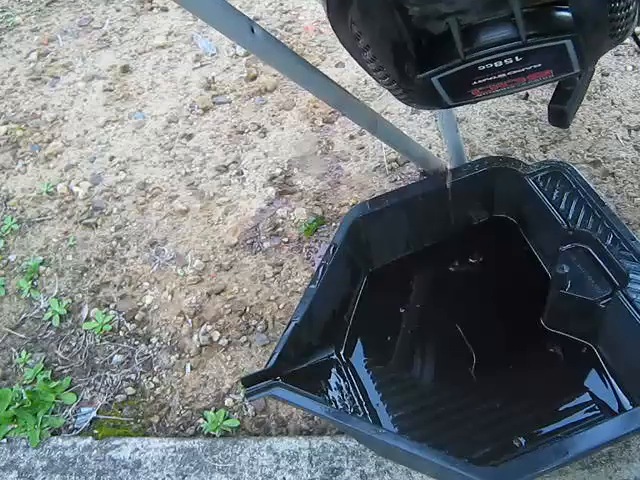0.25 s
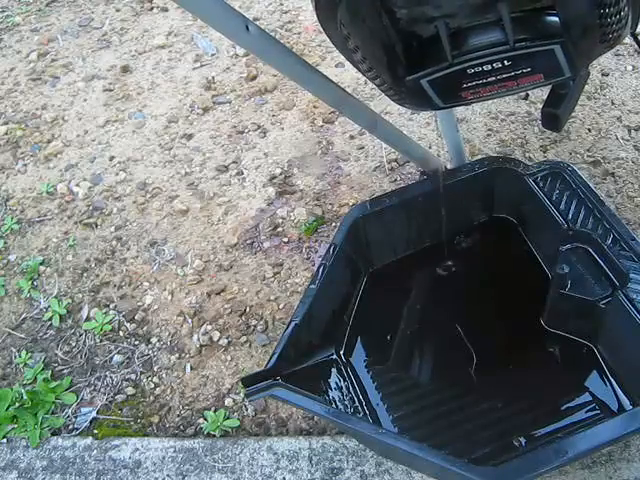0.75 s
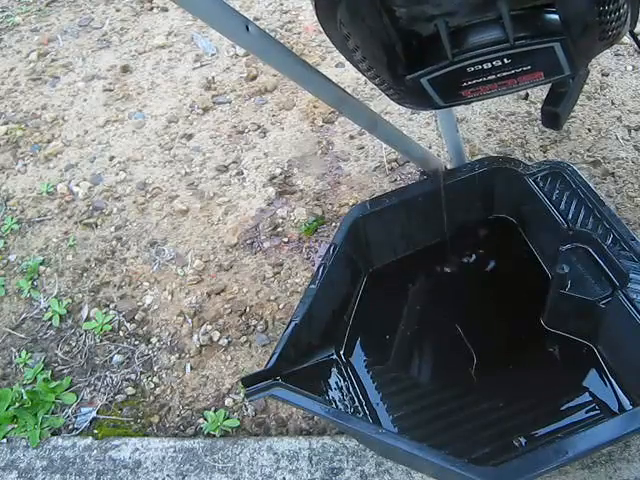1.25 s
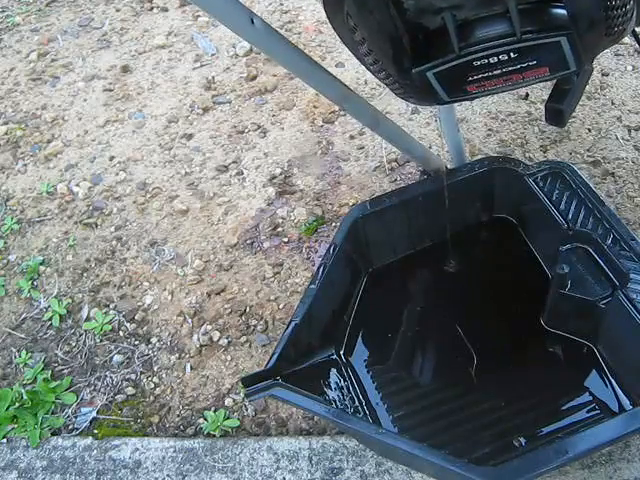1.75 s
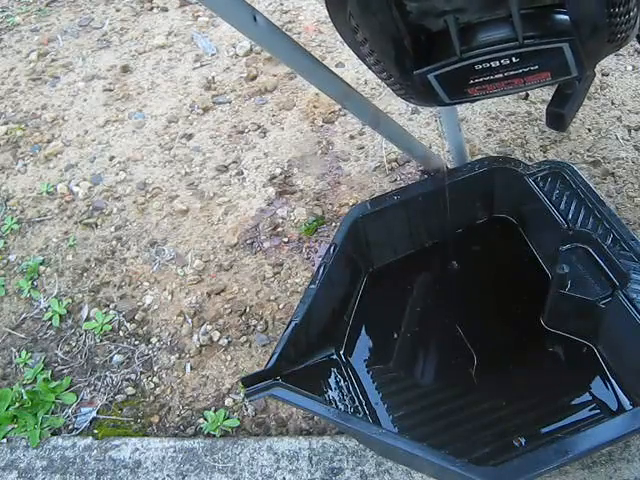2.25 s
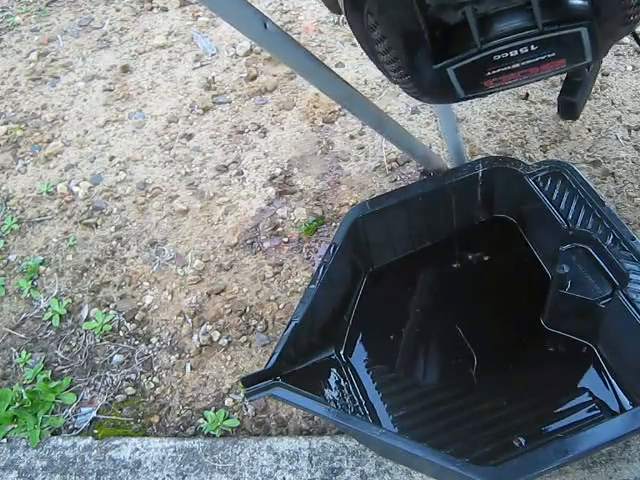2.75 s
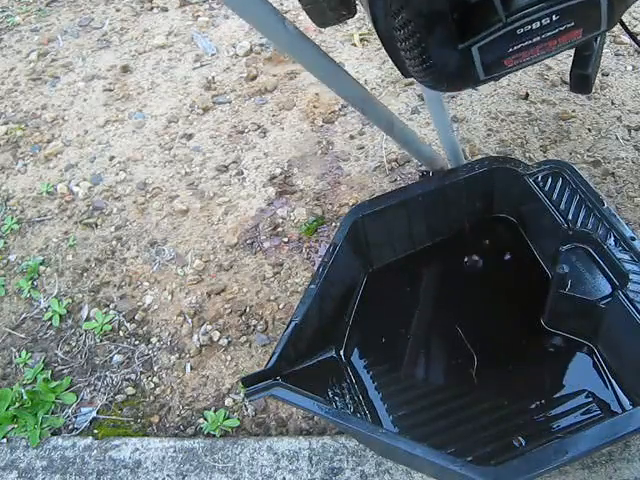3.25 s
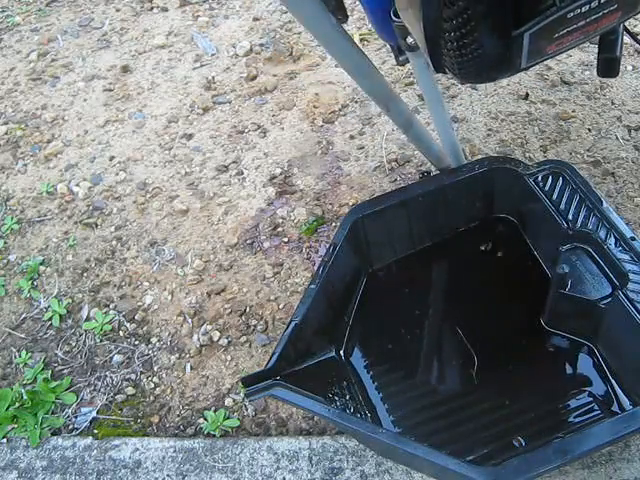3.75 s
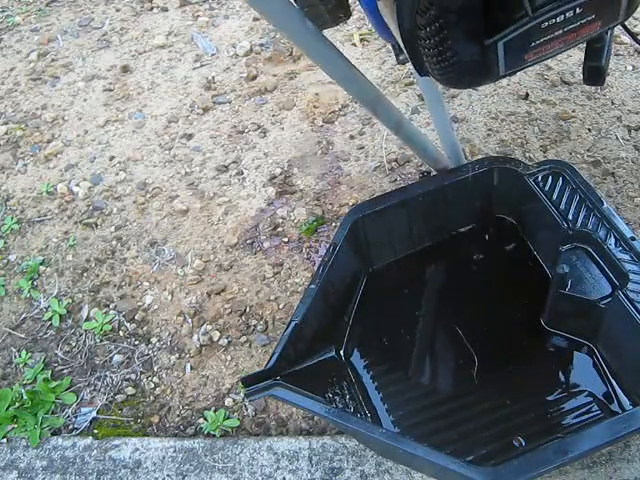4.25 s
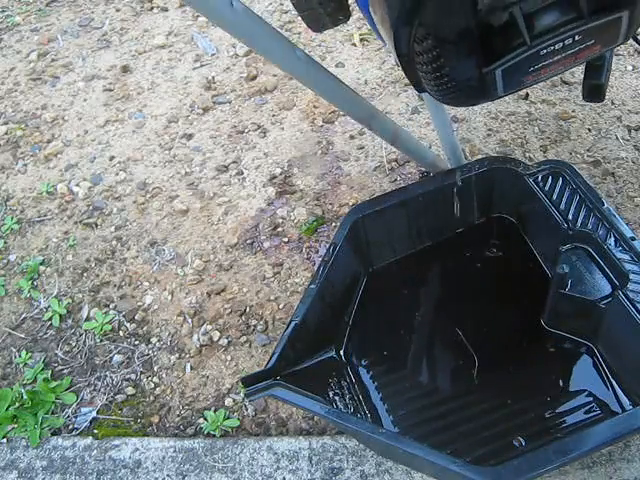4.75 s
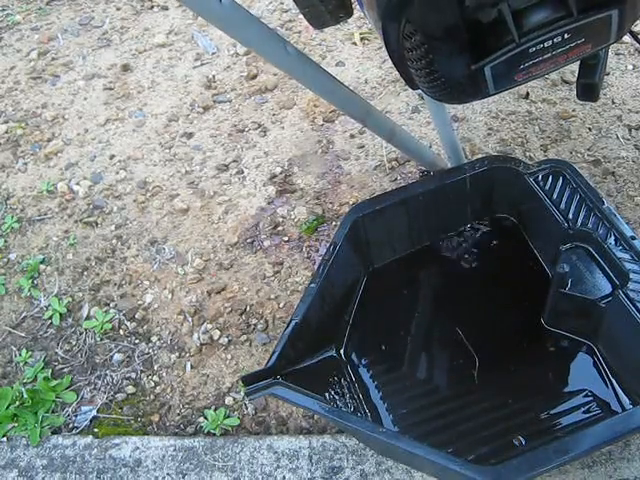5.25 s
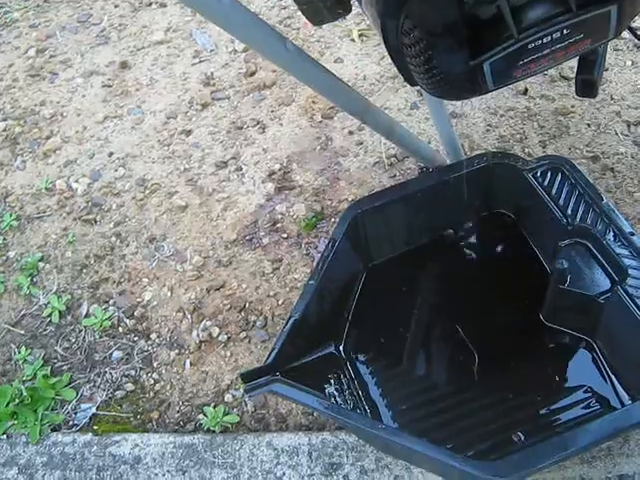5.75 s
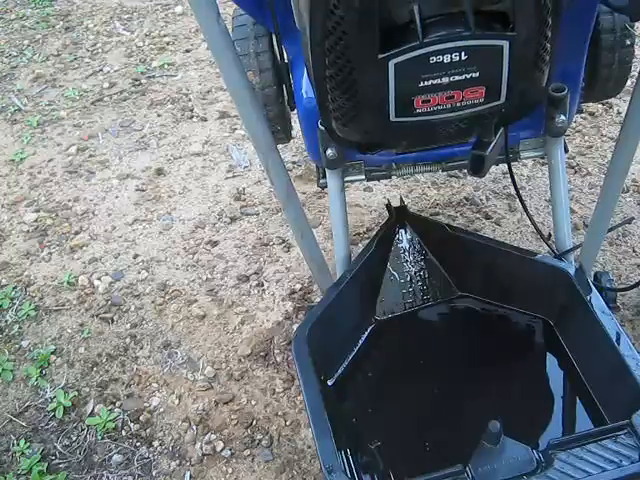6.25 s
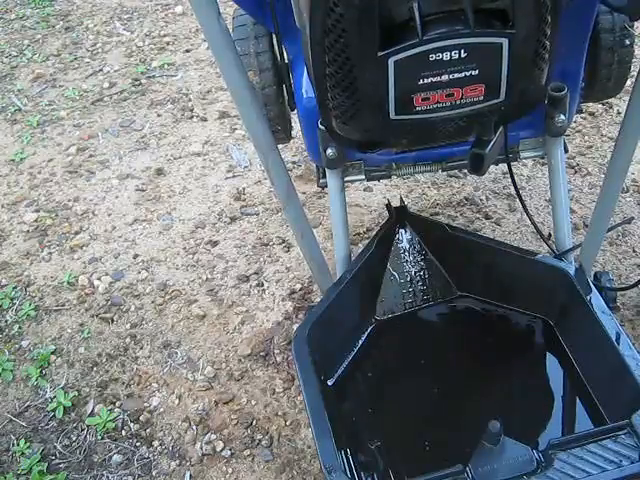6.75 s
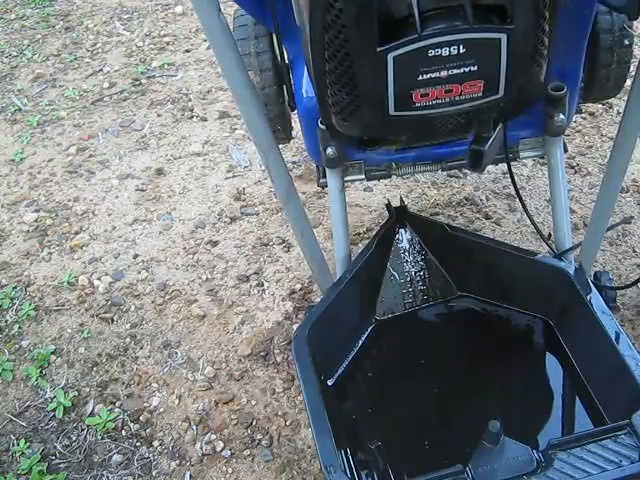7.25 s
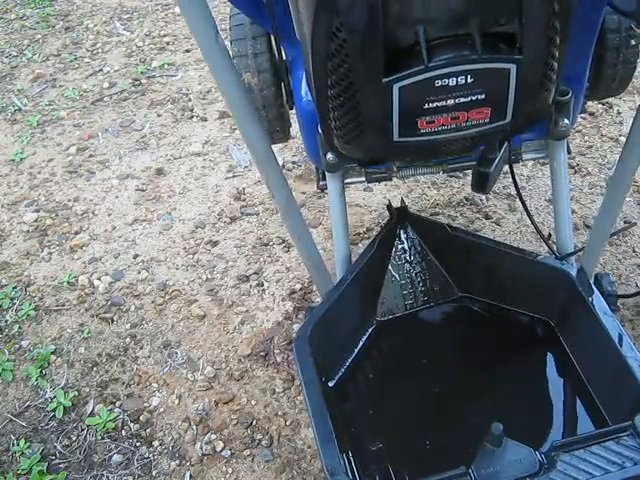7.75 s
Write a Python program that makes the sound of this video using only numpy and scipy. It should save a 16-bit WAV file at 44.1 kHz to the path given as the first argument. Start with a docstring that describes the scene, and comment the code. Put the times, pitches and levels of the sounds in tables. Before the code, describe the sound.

Thin oil drips patter into a plastic pan outdoors, interrupted by a mower shifting on gravel with crunches and metallic knocks.

```python
"""Outdoors in a gravel yard, used oil dribbles from a tipped mower into a plastic pan.
Each drop ticks and traps a small air bubble, which resonates in a brief chirp. The mower shifts:
gravel scrapes and crunches by stick-slip friction, and knocks ring the steel deck and the pan.
Far traffic rumbles, engines drone, and wind thumps the faintly hissing microphone.
Near six seconds the sound drops out for a fifth of a second."""
import sys
import numpy as np
from scipy import signal
from scipy.fft import rfft, irfft
from scipy.io import wavfile
from scipy.ndimage import uniform_filter1d

SR = 44100
rng = np.random.default_rng(int(sys.argv[2]) if len(sys.argv) > 2 else 0)


def pcm_store(signal):
    """Save signal as 16-bit PCM."""
    levels = np.round(np.clip(np.atleast_2d(signal), -1, 1) * 32767)
    wavfile.write(sys.argv[1], SR, levels.astype(np.int16).T)


N = 354123

# Spectral shapes of the noises: frequency_hz, relative_density_db
RUMBLE_SPECTRUM = [(41, -28.5), (70, -6.5), (96, -10.5), (130, -2), (167, -0.5), (242, -8.5), (424, -18),
                   (500, -21.5), (650, -40), (1100, -120)]
FAR_HISS_SPECTRUM = [(180, -35.5), (300, -4.5), (432, -8), (480, -5), (632, -7), (917, -6), (1440, -15),
                     (2500, -23), (3250, -47.5), (5500, -120)]
WIND_SPECTRUM = [(8, -18.0), (22, 9.5), (60, 7), (110, -3.5), (300, -55.5)]
GRIT_SPECTRUM = [(590, -26.5), (1000, -9), (1390, -1.5), (2140, 1.5), (2300, 0.5), (3200, -1.5), (4040, -2),
                 (4880, -6), (5530, -50), (6310, -18.5), (7200, -60), (9360, -73.5), (15800, -120)]
DECK_SPECTRUM = [(130, -48), (220, -22.5), (472, -5.5), (517, -20), (606, -7), (739, -12), (964, -5),
                 (1600, -17.5), (2080, -53), (3520, -120)]
SPLASH_SPECTRUM = [(1200, -28), (2000, 1), (4700, 10.5), (5500, -24.5), (6400, -4), (7300, -52)]
MICROPHONE_SPECTRUM = [(880, -28), (1500, -4), (1860, -5.5), (2020, -2.5), (2120, -3.5), (2420, -4),
                       (2860, -4), (3300, -2.5), (3590, -4.5), (3940, -3), (4580, -4.5), (5440, -10.5),
                       (5840, -14.5), (7210, -47), (9370, -84), (15900, -120)]
# Distant background: time_s, rumble_db, hiss_db
BACKGROUND_LEVELS = [(0, -49.5, -50.5), (.7, -47, -50.5), (.85, -52, -54), (1.14, -46.5, -51),
                     (1.58, -50.5, -53), (2.14, -46, -48.5), (2.55, -53.5, -56), (2.76, -48.5, -55),
                     (2.9, -60, -49), (3.27, -48.5, -53), (3.71, -54, -54), (4.07, -47.5, -50),
                     (4.9, -51, -52.5), (5.45, -46, -50.5), (6.2, -51, -53.5), (6.55, -45, -49.5),
                     (7.0, -41.5, -47.5), (7.3, -46, -50), (7.6, -46, -48), (8.03, -47.5, -41)]
# Far engine tones: start_s, length_s, pitch_hz, glide_hz_per_s, level_db
ENGINE_DRONES = [(.15, 0.68, 272.5, 6, -55.5), (1.1, 0.64, 277, 3, -52.5), (1.65, 0.41, 164.2, -1, -50.5),
                 (2, 0.65, 151.5, 5.5, -49), (3.6, 2.12, 189.9, 1.1, -45), (3.65, 1.56, 150.5, 1.5, -51.5),
                 (5.1, 0.73, 138, -14, -50), (6.55, 0.88, 470.3, 12.5, -54), (6.92, 0.81, 177.3, 8.5, -48),
                 (7.7, .5, 185, -40, -48)]
# Wind strength: time_s, level_db
WIND_LEVELS = [(0, -66), (.6, -61.5), (1.7, -66), (2.14, -66), (2.5, -68), (3.8, -69), (4.1, -59),
               (5, -67.5), (5.4, -58.5), (6.17, -61.5), (6.36, -48), (6.9, -52), (7.3, -65), (8.03, -62)]
# Pressure pulses of gusts: start_s, level_db, pitch_hz
GUSTS = [(5.28, -43, 60), (5.33, -39, 69.8), (6.148, -36.5, 70.2), (6.181, -35.5, 76.3), (6.22, -33, 59.7),
         (6.303, -37, 61), (6.351, -40, 70), (6.472, -33.5, 50), (6.526, -37, 69.5), (6.739, -28.5, 54.5),
         (6.777, -27, 103), (6.792, -33, 90), (6.912, -35, 60.3), (6.96, -34, 50), (6.985, -23, 141),
         (7.189, -40, 60), (7.27, -41, 111)]
# The mower slides on gravel: start_s, rise_s, hold_s, level_db, deck_trim_db, sand_trim_db
SCRAPES = [(0, 0.039, 0.1, -41, 8, -9), (0.173, 0.021, .03, -47, 4, -10),
           (2.494, 0.017, 0.055, -51, -1, -1.5), (2.625, 0.035, .13, -44, 7.5, 0.5),
           (2.832, 0.048, 0.054, -39.5, -10, 0.5), (2.933, 0.016, 0.084, -34, 8, -16),
           (3.043, 0.017, 0.051, -36.5, 10, -10), (3.12, 0.027, 0.14, -45, -12, -11),
           (3.288, 0.094, 0.022, -29.5, 4, -12), (3.408, 0.015, 0.13, -36.5, 12, -16),
           (3.557, 0.017, 0.23, -49.5, 2, 2), (3.915, .005, 0.072, -46.5, 11, -4.5),
           (3.996, 0.028, 0.11, -42.5, 8, -1.5), (4.114, .01, 0.15, -42.5, -5.5, -4),
           (4.29, 0.074, 0.2, -44.5, -11, -6.5), (4.571, .005, 0.028, -41, 9, -7),
           (4.614, 0.0045, 0.058, -50, 22, -1), (4.713, 0.041, .12, -40, -2, -7),
           (4.9, 0.035, 0.15, -49.5, -1, 2), (5.12, 0.016, 0.058, -51.5, 10, -3),
           (5.26, 0.0079, 0.015, -47.5, -10, 9.5), (5.317, 0.023, 0.23, -51, -4, 6.5),
           (5.6, 0.12, .1, -53, 5.5, 3), (7.466, .01, .22, -45.5, 5.5, -6.5),
           (7.703, 0.044, .11, -36.5, -1, -7), (7.856, 0.041, 0.027, -33, 9, -14),
           (7.934, .01, .1, -42.5, -4, -6)]
# Stones give way: start_s, level_db, deck_trim_db, pitch_hz
CRUNCHES = [(.0548, -25.5, -23, 3470), (0.089, -26, -12, 3200), (0.1312, -25.5, -2, 3260),
            (0.16, -25.5, -20, 2710), (2.643, -22, -17, 4000), (2.6796, -20, -15, 3990),
            (2.7614, -20, -18, 3370), (2.7759, -12.5, -12, 3230), (2.8784, -21.5, -18, 3340),
            (2.9342, -21, 1, 1950), (2.96, -29, -1, 1990), (2.9894, -15, -13, 2100), (3.01, -21, -24, 2640),
            (3.057, -15, -22, 1900), (3.0764, -18, 6, 1930), (3.1587, -24, -23, 1930),
            (3.2628, -23.5, -11, 3900), (3.342, -19, -3.5, 1960), (3.3777, -12.5, -7, 2120),
            (3.4033, -21.5, 17, 1940), (3.4216, -29, -15, 2120), (3.477, -17.5, -4, 2120),
            (3.5243, -15, 4.5, 2160), (3.585, -29, -5, 2130), (3.61, -24, -18, 3290), (3.78, -32, -4, 3170),
            (3.8636, -27, -15, 2140), (3.923, -14, -17, 4100), (4.0527, -14, -13, 3400),
            (4.123, -16, -11.5, 3350), (4.16, -18, -27, 3250), (4.2083, -19.5, -11, 3260),
            (4.238, -13.5, -6.5, 3180), (4.3675, -28.5, -8, 1920), (4.4838, -25, -24, 2760),
            (4.521, -20, -15, 3900), (4.57, -14.5, -10, 3820), (4.5833, -13, -5, 2300),
            (4.619, -20.5, 10, 2850), (4.664, -24.5, -12, 4150), (4.7686, -17, -6, 3000),
            (4.7918, -14, -6, 3200), (4.8317, -13.5, -16, 3870), (4.878, -25.5, -11, 1960),
            (5.0479, -33.5, -5, 4190), (5.1917, -33, 4, 2400), (5.2654, -29, -7, 3880),
            (5.2782, -17, -23.5, 3993), (5.4006, -24, -23, 3890), (7.311, -22, -22, 2530),
            (7.4717, -22, -7, 3070), (7.5233, -30, -19.5, 3310), (7.5919, -26, 3, 2650),
            (7.644, -24, -9, 2568), (7.7608, -20.5, -11, 3420), (7.909, -14, -3, 3150)]
# Steel deck resonances excited by friction: frequency_hz, bandwidth_hz, relative_db
DECK_RESONANCES = [(448, 53, -15.5), (568, 36, -10), (1030, 170, -6.5), (1210, 29, -11), (1902, 26, -9),
                   (1960, 8.8, -13), (2820, 14, -4.5), (3380, 24, -23.5), (3260, 18, -4.5), (4075, 61, -10)]
# Modes of the struck plastic pan and steel deck: frequency_hz, relative_db, base_t60_s
PAN_MODES = [(316, 4, 0.043), (672, 4, 0.06), (790, 3.5, 0.04), (1070, -19.5, 0.075), (1550, -14, 0.17),
             (1900, -15.5, 0.053), (2595, -19, 0.095), (2830, -29, 0.16)]
DECK_MODES = [(516, -13.5, 0.028), (923, -4, 0.12), (930, -7.5, .06), (1044, -1.5, 0.08),
              (1210, -5.5, 0.079), (2064, -5.5, 0.064)]
# Blows on pan and deck: start_s, level_db, decay_time_ratio, tilt_db_per_octave
PAN_KNOCKS = [(1.654, -30.5, 0.34, -1), (2.1415, -34, 0.64, -8), (3.276, -37.5, 0.68, 2),
              (4.6142, -14, 0.64, -0.5), (5.139, -38.5, 1, 3), (5.19, -37.5, 0.79, 4),
              (7.863, -28.5, 0.91, -5)]
DECK_CLANKS = [(2.938, -35.5, 1, 11), (3.403, -16.5, 0.91, 1), (3.409, -17.5, 0.82, -2),
               (3.423, -24, 0.71, 5.5), (3.442, -15, 0.99, -7), (3.48, -29, 1, 5), (3.524, -16, 0.59, -4),
               (4.053, -39.5, 0.97, 2.5), (7.901, -29, 0.64, -3)]
# Air trapped by drops: start_s, level_db, pitch_hz, glide_octaves, life_ms
BUBBLES = [(0.1998, -36, 2670, 0.085, 8.3), (0.223, -45.5, 1575, -0.00025, 13),
           (0.3113, -38, 2670, 0.79, 1.6), (0.4243, -33, 3360, 0.69, 2.1),
           (0.4854, -40.5, 2070, -0.13, 8.1), (0.5068, -32.5, 2130, 0.74, 5.4),
           (0.52, -36.5, 2170, -0.11, 9.1), (0.5472, -35, 3300, 0.4, 2.4), (0.5504, -29.5, 3060, -0.19, 1),
           (0.5713, -41, 3550, 0.52, 5), (0.577, -37, 3190.0, 0.0, 1.7), (0.594, -38.5, 1980, 0.02, 10),
           (0.634, -38, 2390.0, 0.0, 1.9), (0.652, -32.5, 2770, 1.1, 2.2),
           (0.6648, -38.5, 2270.0, 0.096, 5.5), (0.739, -38.5, 2400, 0.074, 9.1),
           (0.7783, -30.5, 1530, -0.2, 0.91), (0.778, -30.5, 3800, 0.0, 1.2), (0.795, -45, 1800, 0.13, 13),
           (0.8082, -33.5, 4440, 0.38, 3.4), (0.812, -39, 2040, 0.1, 18), (0.826, -40, 2500, 0.5, 7.9),
           (0.842, -34, 2220.0, 0.4, 7.9), (0.867, -41.5, 3000, 1.1, 9.4), (0.8992, -37, 3380, 0.078, 8.2),
           (0.8998, -30, 2100, -0.02, 3.2), (0.928, -28, 2370, -0.098, 1.3),
           (0.937, -43.5, 1700, -0.042, 14), (0.9713, -30.5, 2850, -0.24, 0.62),
           (0.976, -41.5, 1810, 0.06, 19), (0.995, -40, 2280, 0.6, 6), (1.017, -36, 3300, 0.79, 4.2),
           (1.0538, -34.5, 3360, 0.85, 3.7), (1.0525, -29, 1600, 0.027, 4.1), (1.058, -39, 1770, 0.11, 13),
           (1.0625, -42, 2250, 0.97, 12), (1.08, -33.5, 2400, 1.2, 6.7), (1.088, -29, 3690.0, -0.099, 1.7),
           (1.147, -37.5, 2060, 0.46, 7.0), (1.1583, -39, 3270.0, 0.14, 6.6), (1.1626, -36, 1970, 0.14, 18),
           (1.1953, -31.5, 3040.0, 0.11, 2.2), (1.2378, -29.5, 2020, -0.016, 4.4),
           (1.2428, -42, 1960, -0.034, 19), (1.262, -44, 2110, 0.8, 7.6), (1.269, -31, 4670, 0.14, 1.4),
           (1.2736, -45, 1620, 0.07, 16), (1.2903, -32.5, 1850, 1.6, 5.2), (1.2898, -32.5, 3340, 0.4, 9.1),
           (1.3974, -33, 3850, 0.16, 2.0), (1.3994, -25.5, 2510.0, 0.25, 1.6),
           (1.45, -41.5, 2000.0, 0.66, 11), (1.4703, -39, 1960, 1.44, 3.4),
           (1.4764, -32.5, 3010, 0.21, 3.2), (1.5348, -26, 2950, 0.075, 1.5),
           (1.5423, -46, 1580.0, 0.18, 10), (1.5692, -35.5, 4030, 0.35, 2),
           (1.5717, -35, 1780.0, 0.16, 2.0), (1.574, -35, 2116, 0.13, 8.4),
           (1.6158, -39.5, 2370, 0.89, 8.8), (1.659, -35, 2510.0, 0.4, 2.4),
           (1.6588, -33.5, 4580, 0.049, 2.4), (1.695, -37.5, 2200, 0.34, 3.2),
           (1.764, -43, 1504, 0.093, 23), (1.793, -39, 3420, 0.07, 6.3), (1.804, -47.5, 1660, 0.096, 25),
           (1.825, -40.5, 3200, 0.3, 14), (1.8423, -38.5, 2150, 0.038, 14.4),
           (1.8649, -28.5, 3920, 0.48, 1.6), (1.887, -38, 2300, 0.1, 1.5), (1.9223, -37, 2180, 0.16, 5.3),
           (1.966, -30.5, 2420, 1.18, 1.54), (1.9963, -37, 3040.0, 0.24, 1.6),
           (2.0024, -32.5, 2200, -0.11, 14), (2.036, -47, 3750, -0.17, 9.4), (2.048, -35, 2450, 0.55, 1.9),
           (2.0664, -35.5, 2150, -0.047, 13), (2.1239, -29.5, 2810, 0.79, 2.15),
           (2.1344, -38.5, 2150, -0.089, 11), (2.1708, -32, 2390.0, 0.44, 1.9),
           (2.1761, -41.5, 3000, -0.24, 13.5), (2.218, -37, 3240, 0.44, 2.7), (2.2388, -37, 3140, 0.15, 9),
           (2.271, -37, 1990, 0.11, 36), (2.301, -33, 3490, -0.13, 9.3), (2.323, -38, 2020, 0.46, 4),
           (2.3622, -27, 3300, 0.81, 4.3), (2.366, -45, 3500, 0.21, 2.4), (2.372, -47, 3120, 0.19, 9),
           (2.5195, -35, 2350, -0.034, 5), (2.517, -38.5, 3980, 0.13, 3.8),
           (2.721, -32.5, 2130, -0.038, 12.7), (3.212, -27.5, 2056, -0.031, 6.6),
           (3.71, -32.5, 3570, 0.0048, 1.5), (4.3966, -34.5, 2750, 0.057, 14),
           (4.6106, -29.5, 2330, 0.046, 3.8), (4.726, -41.5, 2280, 0.03, 5.1), (4.953, -34, 1640, 0.6, 5.6),
           (4.9588, -21.5, 2140, 0.02, 5.1), (4.9706, -28, 3020, -0.23, 1.2),
           (5.157, -42, 2480, -0.067, 14), (5.22, -38.5, 2280, 0.28, 7.8), (5.295, -33, 2150, -0.021, 8.6),
           (5.335, -42, 2100, 0.3, 5.5), (5.3518, -36, 2000, 0.086, 13), (5.378, -42, 2000, 0.4, 4),
           (5.4432, -37.5, 2170, 0.11, 7.8), (5.4605, -30.5, 3520.0, 0.11, 1.4),
           (5.532, -46, 2450, 1.05, 2), (5.534, -24, 2140, 0.89, 1.1), (5.5643, -22.5, 3160, -0.011, 1.2),
           (5.6903, -23.5, 2165, 0.31, 9.3), (5.7, -37, 2020, 0.063, 17), (5.74, -29.5, 3930, 0.081, 2),
           (5.7415, -38, 4330, -0.053, 7.0), (6.36, -46.5, 3350, -0.37, 5.5)]
# Echoes from the pan's walls: delay_ms, gain_db
PAN_REFLECTIONS = [(1.3, -20), (3.1, -15), (6.2, -13.5)]

SCRAPE_T60_S, CRUNCH_T60_AT_3KHZ_S = .15, .058
DROPOUT_S = (5.7955, 5.993)


def undb(db):
    """Amplitude ratio of a level in decibels."""
    return 10 ** (np.asarray(db) / 20)


def unit(x):
    """Normalisation to an rms of 1."""
    return x / np.sqrt(np.mean(x ** 2))


def curves(table):
    """Linear interpolation of each column over time."""
    times, *columns = np.transpose(table)
    return [np.interp(np.arange(N) / SR, times, column) for column in columns]


def add(out, start_s, x):
    """Superposition of x on out from start_s."""
    i = int(start_s * SR)
    out[i:i + len(x)] += x[:N - i]


def band_limit(x, order, cutoff_hz, kind):
    """Maximally flat filtering."""
    return signal.sosfilt(signal.butter(order, cutoff_hz, kind, fs=SR, output="sos"), x)


def colour(x, spectrum, peaks=(), lift_db=0):
    """Minimum-phase filtering by a spectrum and its resonance peaks; the result has rms 1."""
    size = 4096
    hz = np.arange(size // 2 + 1) * SR / size + 1
    knots_hz, knots_db = np.transpose(spectrum)
    gain = undb(np.interp(np.log(hz), np.log(knots_hz), knots_db))
    gain *= 1 + sum(undb(lift_db + db) / np.sqrt(1 + (2 * (hz - centre) / width) ** 4)
                    for centre, width, db in peaks)
    cepstrum = irfft(np.log(gain))
    cepstrum[1:size // 2] *= 2
    cepstrum[size // 2 + 1:] = 0
    return unit(signal.oaconvolve(x, irfft(np.exp(rfft(cepstrum))))[:N])


def noise(spectrum):
    """Spectrally shaped white noise of rms 1."""
    return colour(rng.standard_normal(N), spectrum)


def wander(rate_hz):
    """Random modulation: steps at rate_hz, smoothed twice, of rms 1."""
    hold = int(SR / rate_hz)
    steps = np.repeat(rng.standard_normal(N // hold + 1), hold)
    return unit(uniform_filter1d(uniform_filter1d(steps, hold), hold)[:N])


def far_traffic():
    """Incoherent distant sources sum to a broadband rumble and a smooth hiss."""
    rumble_db, hiss_db = curves(BACKGROUND_LEVELS)
    rumble = undb(rumble_db + 2.0 * wander(6)) * noise(RUMBLE_SPECTRUM)
    return rumble + undb(hiss_db + 1.7 * wander(15)) * noise(FAR_HISS_SPECTRUM)


def far_engines():
    """Periodic sources radiate tones, here wavering in amplitude and frequency."""
    out = np.zeros(N)
    for start_s, length_s, hz, glide, db in ENGINE_DRONES:
        t = np.arange(int(length_s * SR)) / SR
        amplitude = np.sqrt(2) * undb(db + 2.0 * wander(8.04)[:len(t)])
        pitch_hz = (hz + glide * t) * (1 + .008 * wander(14.34)[:len(t)])
        swell = np.sin(np.pi * t / length_s) ** 0.69  # quick in, long hold, quick out
        add(out, start_s, amplitude * swell * np.sin(2 * np.pi * np.cumsum(pitch_hz) / SR))
    return out


def wind():
    """Turbulent pressure buffets the microphone; each gust adds a low pulse of 1.6 cycles."""
    wind_db, = curves(WIND_LEVELS)
    out = undb(wind_db + wander(13)) * noise(WIND_SPECTRUM)
    for start_s, db, hz in GUSTS:
        cycles = np.arange(int(1.6 * SR / hz)) * hz / SR
        add(out, start_s, -undb(db) * np.sin(np.pi * cycles / 1.6) * np.sin(2 * np.pi * cycles))
    return out


def clicks(spread_db):
    """Impulsive noise: heavy-tailed amplitudes give dense, uneven clicks in clumps."""
    level_db = spread_db * rng.exponential(size=N) + 2.8 * wander(260) + 1.5 * wander(60)
    return rng.standard_normal(N) * undb(level_db)


def mower_on_gravel():
    """Stick-slip friction: grit grinds and stones give way, forcing the deck into vibration."""
    grit, deck, sand, stones = np.zeros((4, N))
    deck_coupling_db = -14.5
    for start_s, rise_s, hold_s, db, deck_db, sand_db in SCRAPES:
        t = np.arange(int((rise_s + hold_s + SCRAPE_T60_S) * SR)) / SR
        release = 1000 ** (-np.maximum(t - rise_s - hold_s, 0) / SCRAPE_T60_S)
        push = undb(db) * np.minimum(t / rise_s, 1) * release
        add(grit, start_s, undb(-4) * push)
        add(deck, start_s, undb(deck_db + deck_coupling_db) * push)
        add(sand, start_s, undb(sand_db) * push)
    t = np.arange(SR // 4) / SR
    for start_s, db, deck_db, hz in CRUNCHES:
        t60_s = CRUNCH_T60_AT_3KHZ_S * (hz / 3000) ** -.3  # lower stones ring longer
        slip = undb(db) * (1 - np.exp(-t / 0.0011)) * 1000 ** (-t / t60_s)
        add(grit, start_s, undb(-18) * slip)
        add(deck, start_s, undb(deck_db + deck_coupling_db) * slip)
        burst = slip * rng.standard_normal(len(t))
        stone_ring = signal.lfilter(*signal.iirpeak(hz, Q=9, fs=SR), undb(-2) * burst)
        steel_ring = signal.lfilter(*signal.iirpeak(hz, Q=70, fs=SR), undb(0.5) * burst)
        add(stones, start_s, stone_ring + steel_ring)
    out = grit * colour(clicks(1.4), GRIT_SPECTRUM, DECK_RESONANCES, lift_db=8.5)
    out += deck * colour(clicks(1.0), DECK_SPECTRUM, DECK_RESONANCES, lift_db=-4.5)
    out += sand * band_limit(colour(clicks(3.7), GRIT_SPECTRUM), 3, 3400, "high")
    return out + band_limit(stones, 4, [1300, 4900], "band")


def impacts(blows, modes):
    """Free vibration: a brief contact excites normal modes, each decaying exponentially."""
    out, t = np.zeros(N), np.arange(SR // 5) / SR
    onset = 1 - np.exp(-t / 0.00015)
    for start_s, db, decay_ratio, tilt_db in blows:
        ring = np.zeros(len(t))
        for hz, mode_db, t60_s in modes:
            gain = undb(mode_db + tilt_db * np.log2(hz / 700) + rng.uniform(-0.96, 2))
            ring += gain * 1000 ** (-t / (t60_s * decay_ratio)) * np.sin(2 * np.pi * hz * t)
        add(out, start_s, -undb(db) * ring * onset / 2)
    return band_limit(out, 2, 220, "high")  # small bodies radiate no deep bass


def bubble(db, hz, glide_octaves, life_ms):
    """Mass-spring resonance of oil on trapped air; the pitch rises as a bubble nears the surface."""
    life_samples = life_ms * SR / 1000
    age = np.arange(int(2.2 * life_samples)) / life_samples
    phase, wobble = rng.random(2)
    flutter = 1 + 0.4 * np.cos(2 * np.pi * (1.61 * age + 0.38 * wobble - .4))  # the oil wobbles
    envelope = 1.585 * (1 - np.exp(-age / 0.22)) * np.exp(-(age / 0.84) ** 2.8)
    pitch_hz = hz * 2 ** (glide_octaves * np.minimum(age, 1) ** 2)  # a negative glide sags
    return undb(db) * envelope * flutter * np.sin(2 * np.pi * (np.cumsum(pitch_hz) / SR + phase))


def dribbling_oil():
    """Air entrainment: drops tick and trap ringing bubbles, over a patter of faint ones."""
    rings, splash = np.zeros((2, N))
    tick = np.exp(-np.arange(600) / SR / 0.0074)
    for start_s, db, hz, glide_octaves, life_ms in BUBBLES:
        add(rings, start_s, bubble(db, hz, glide_octaves, life_ms))
        # small, high bubbles come with the sharper splash
        add(splash, start_s, undb(db - 18 + 8.5 * np.log2(hz / 2500)) * tick)
    for when, level, pitch, glide, life in rng.random((200, 5)):
        faint = bubble(db=-51 + 11 * level ** 1.1, hz=1700 * 2 ** (1.3 * pitch),
                       glide_octaves=0.48 * glide ** 1.2, life_ms=1.6 + 4 * life ** 3)
        add(rings, .3 + 5.4 * when ** 1.6, faint)
    rings *= 1 + .22 * wander(900)  # spray and ripples roughen every ring
    for delay_ms, db in PAN_REFLECTIONS:
        lag = int(delay_ms * SR / 1000)
        rings[lag:] += undb(db) * rings[:-lag]
    return band_limit(rings, 3, 5300, "low") + splash * colour(clicks(1.4), SPLASH_SPECTRUM)


def scene():
    """Linear superposition of all sources at one point."""
    background = far_traffic() + far_engines() + wind()
    knocks = impacts(PAN_KNOCKS, PAN_MODES) + impacts(DECK_CLANKS, DECK_MODES)
    return (background + mower_on_gravel() + knocks + dribbling_oil())[None]


def record(dry):
    """Transduction adds self-noise and a small offset; the sound drops out once and is low-passed."""
    self_noise, offset = undb(-55) * noise(MICROPHONE_SPECTRUM), .0026
    off_s, on_s = DROPOUT_S
    gate_times_s = [off_s, off_s + .001, off_s + .02, off_s + .028, on_s, on_s + .001]
    gate = np.interp(np.arange(N) / SR, gate_times_s, [1, .035, .025, 0, 0, 1])
    treble_cut = signal.ellip(10, .2, 80, 7100, fs=SR, output="sos")
    return signal.sosfilt(treble_cut, (dry + self_noise + offset) * gate)


dry = scene()
out = record(dry)
pcm_store(out)
```